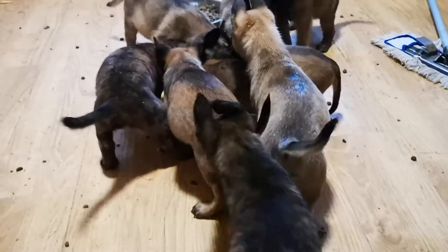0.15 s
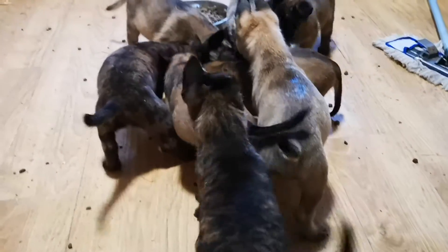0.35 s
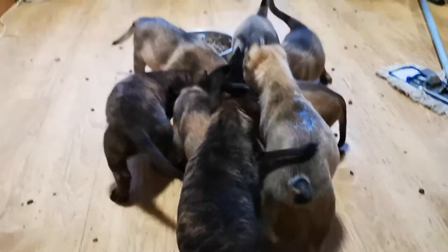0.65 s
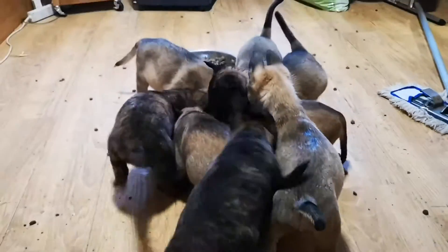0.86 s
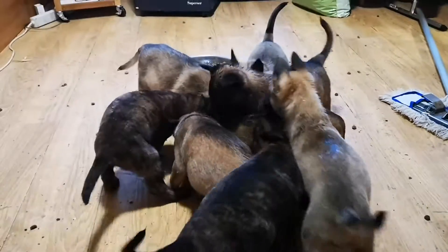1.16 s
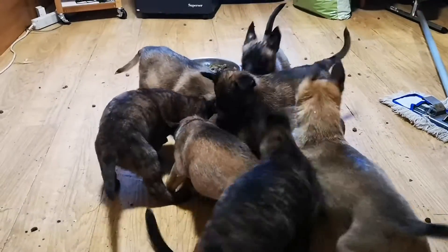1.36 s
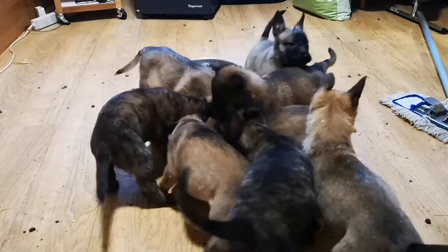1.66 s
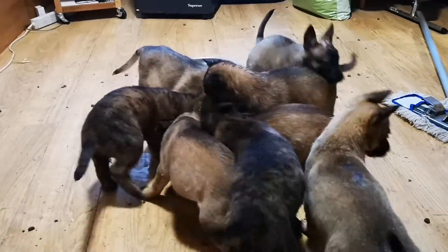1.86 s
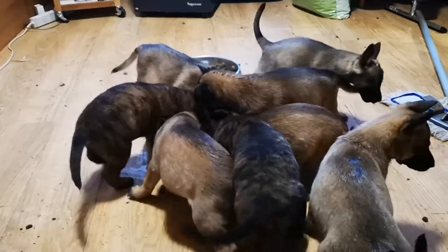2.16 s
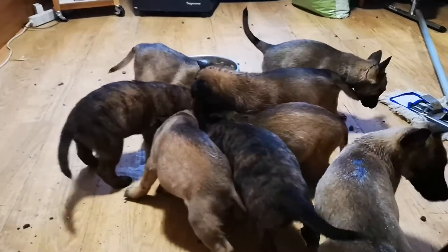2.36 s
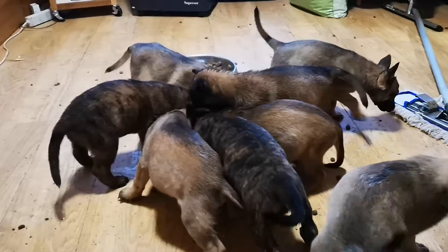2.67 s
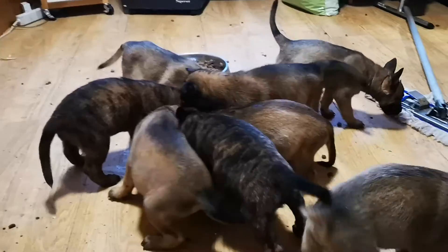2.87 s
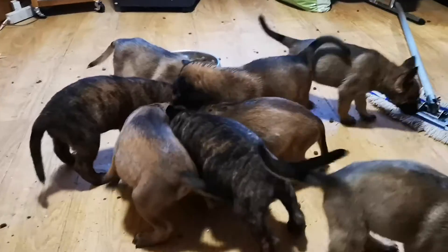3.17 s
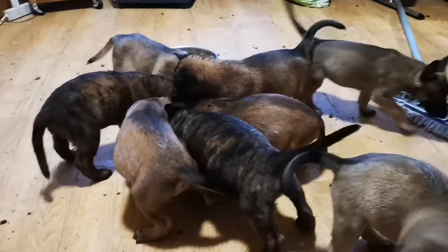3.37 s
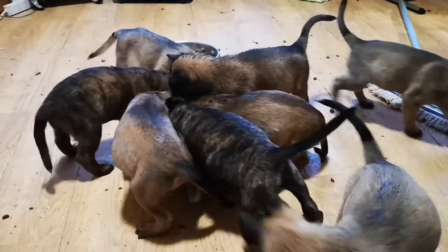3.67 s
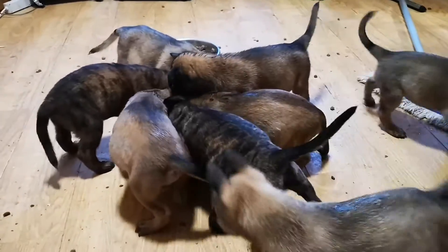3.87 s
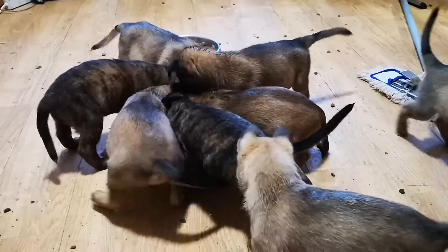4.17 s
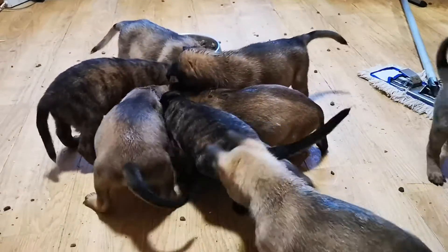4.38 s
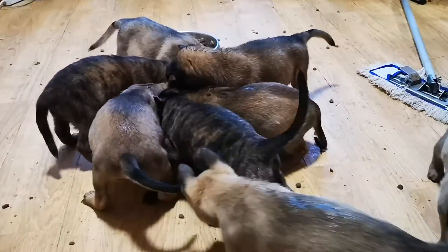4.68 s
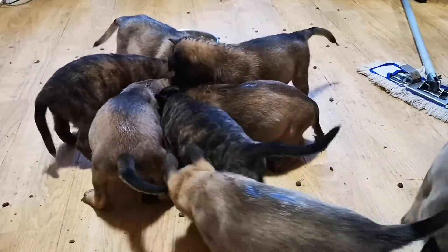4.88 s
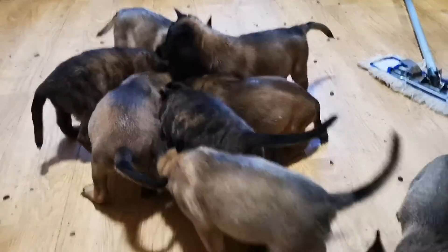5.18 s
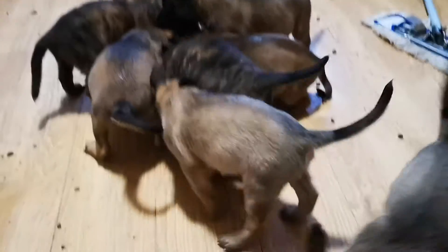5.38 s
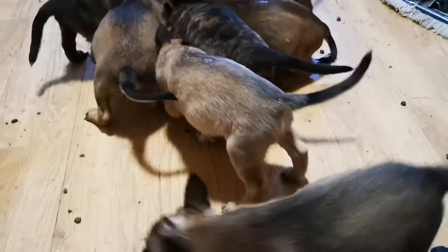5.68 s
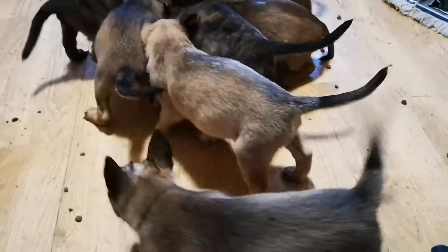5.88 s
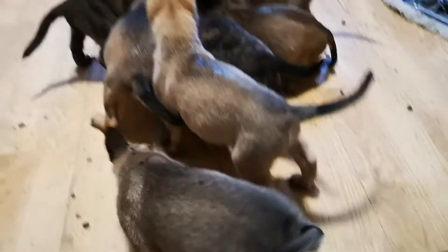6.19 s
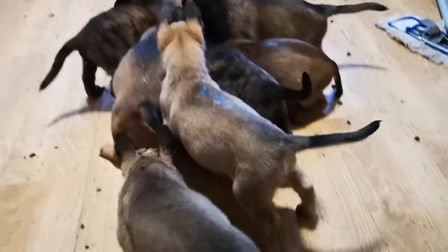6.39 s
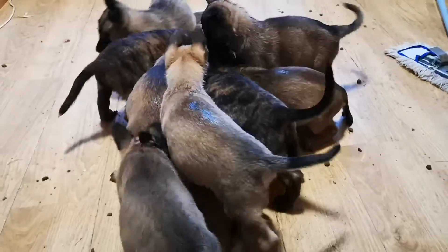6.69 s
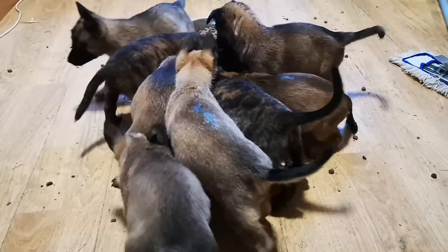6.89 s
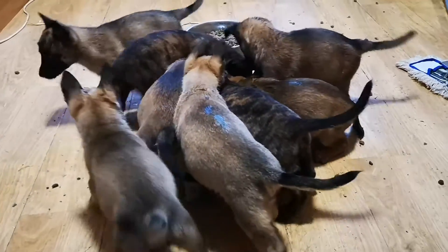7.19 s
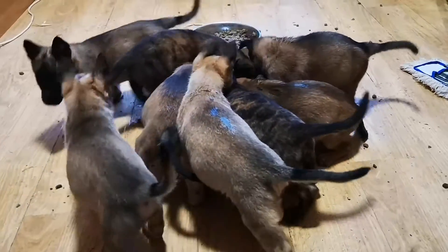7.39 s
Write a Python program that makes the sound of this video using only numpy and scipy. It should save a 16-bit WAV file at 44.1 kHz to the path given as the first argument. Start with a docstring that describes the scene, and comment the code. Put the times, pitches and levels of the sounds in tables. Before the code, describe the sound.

A litter of puppies eats dry kibble indoors, with crunching, wet lip smacks, clicking claws and soft paw thuds on a wooden floor.

```python
"""Small room, wooden floor, close to a phone: a litter of puppies crowds round a bowl of dry kibble.
Paws thud (board flex driving damped modes); claws and kibble click (noise snaps, pitched crunches).
Wet mouths smack (gliding pop, resonant squelch, crackle); scuffling is dense grains, skids are dull scuffs.
Faint house rumble and hiss lie beneath. Diffuse reflections follow all but the low thuds and the ambience."""
import sys
import numpy as np
from scipy import signal
from scipy.fft import rfft, irfft, next_fast_len
from scipy.io import wavfile
from scipy.ndimage import uniform_filter1d

SR = 44100
rng = np.random.default_rng(int(sys.argv[2]) if len(sys.argv) > 2 else 0)


def unload_wav(signal):
    """Save mono or channel-first audio to the path in sys.argv[1] as 16-bit WAV at rate SR, clipped to [-1, 1]."""
    wavfile.write(
        sys.argv[1],
        SR,
        np.round(np.clip(np.atleast_2d(signal).T, -1, 1) * 32767).astype(np.int16),
    )


N = 332055

# paws landing: t/s, relative thud level/dB, flex f/Hz, relative knock level/dB
PAW_LANDINGS = [(0.009, -51, 57.3, -61), (0.182, -33, 76, -41.5), (0.213, -39, 157, -50),
                (0.26, -40.5, 68, -73), (0.526, -48.5, 74, -67.5), (0.711, -37, 86, -53.5),
                (0.798, -43, 86, -53), (0.855, -32, 97.5, -44.5), (0.927, -67, 118, -42),
                (1.018, -44.5, 64, -50), (1.267, -54, 252, -49.5), (1.397, -39.5, 82, -61),
                (1.734, -39.5, 56, -54.5), (1.937, -50, 78.1, -57.5), (2.055, -27.5, 88.7, -46.5),
                (2.121, -33, 89, -54), (2.371, -41.5, 260, -55), (2.468, -46, 270, -56),
                (2.625, -46.5, 60, -52.5), (2.859, -35.5, 93, -46.5), (2.913, -41.5, 111, -63),
                (3.283, -40, 94, -44.5), (3.326, -39, 153, -48), (3.504, -38.5, 81.7, -53),
                (3.781, -43, 117, -50), (3.879, -51.5, 125, -59.5), (4.05, -40.5, 69, -52.5),
                (4.268, -46, 70.0, -75), (4.337, -41, 93.7, -58), (4.523, -42.5, 98, -57),
                (4.694, -40.5, 63, -54.5), (4.949, -31, 81.7, -50.5), (5.041, -38, 74.6, -62),
                (5.099, -39, 86.5, -71), (5.22, -49, 66.5, -54.5), (5.432, -49, 74.5, -53.5),
                (5.647, -34, 102, -45.5), (5.73, -44.5, 60.7, -54), (6.153, -49, 56.3, -70),
                (6.208, -49, 112, -69), (6.402, -53, 207, -53), (6.537, -47, 102, -58),
                (6.598, -47.5, 112, -57.5), (7.267, -41.5, 62.4, -52), (7.309, -42, 65.6, -56),
                (7.428, -43, 89.5, -59)]
# claw and kibble contacts: t/s, relative snap level/dB, relative crunch level/dB, piece f/Hz, left-right/dB
CLICK_EVENTS = [(0.419, -37, -47, 2100, -2), (0.584, -47.5, -54, 3170, -11), (0.8479, -23.5, -40, 3400, 3),
                (1.16, -34.5, -60, 2300, -5.5), (1.332, -24.5, -49.5, 6000, 4),
                (1.3997, -36.5, -51, 2200, -2.5), (1.584, -46, -59, 5660, -6),
                (1.683, -59, -44, 2940, -3.5), (1.725, -34, -47.5, 2630, -3), (1.79, -32, -53, 2420, -4),
                (1.9854, -33, -67, 5750, -7), (1.997, -16.5, -37.5, 5400, -1.5),
                (2.0129, -27, -41, 3460, 1), (2.0624, -23.5, -40.5, 3380, -2), (2.1253, -35, -55, 3550, -7),
                (2.2702, -34.5, -63, 2220, -5), (2.3723, -25, -44, 2480, 5), (2.4146, -28, -50, 2280, -1),
                (2.4647, -33.5, -46, 2180, -9), (2.7871, -34.5, -48, 2200, -8),
                (2.8446, -36, -51, 3820, -1), (2.8726, -16, -35.5, 2100, -1.5),
                (3.252, -25.5, -49, 2200, 3), (3.2936, -29, -48, 2290, -4), (3.3764, -36, -45, 3740, 3),
                (3.465, -34, -41.5, 2400, -2), (3.5098, -29.5, -52, 2280, 2), (3.8422, -47, -35, 2170, -7),
                (3.8565, -58, -37, 3100, 5), (4.006, -57, -53, 2280, 3), (4.0453, -25, -50, 2100, -3),
                (4.0837, -18, -47, 5530, -11), (4.2704, -37.5, -53, 2270, 1), (4.5224, -46, -42, 2400, -7),
                (4.6556, -31, -41, 2080, 0), (4.6708, -21.5, -39, 3300, -2),
                (4.699, -16.5, -25.5, 3600, -6), (4.9513, -26, -33, 3200, -5), (4.995, -29, -44, 3280, 1),
                (5.0358, -24.5, -58, 3170, -2), (5.0861, -27.5, -41, 2590, -3),
                (5.1875, -20.5, -50, 2170, 8), (5.2942, -26, -59, 5350, 2), (5.4931, -34.5, -62, 2260, 3),
                (5.635, -33, -45, 4640, 2), (5.6415, -37, -37.5, 3850, -6), (5.925, -36, -45.5, 4840, -2.0),
                (6.2038, -41, -60, 2200, -3), (6.5415, -33, -58, 2210, -2), (6.9019, -42, -61, 5160, -10),
                (7.0292, -67, -50, 2180, 6), (7.0921, -33, -52, 2210, -5), (7.1383, -35, -49.5, 2520, -8),
                (7.2931, -30.5, -58, 5030, 3), (7.3819, -59, -47, 4000, -2.0)]
# lips and tongues: t/s, relative level/dB, mouth f/Hz, left-right/dB, clear share/1
SMACK_EVENTS = [(0.052, -31, 1843, 3, 0.72), (0.186, -38, 1340, -8, 0.45), (0.348, -42, 1340, -7, 0.41),
                (0.5, -43, 2215, 0, 0.63), (0.573, -41.5, 1780, -5.5, 0.66), (0.67, -40, 970, -8, 0.29),
                (0.689, -38, 2170, 0.5, 0.33), (0.765, -37.5, 972, -3, 0.54),
                (0.957, -34.5, 1060, -11, 0.53), (1.273, -47.5, 1185, 7, 0.48),
                (1.634, -41.5, 2120, 0.0, 0.3), (1.659, -40, 1280, 0.5, 0.64), (1.811, -35, 1810, -2, 0.38),
                (1.953, -33, 1420, 2, 0.19), (2.471, -34, 1800, 0, 0.17), (2.638, -36.5, 1790, -7, 0.31),
                (2.753, -43.5, 940, -5, 0.41), (3.166, -40, 1490, -7, 0.19), (3.228, -43.5, 2340, -9, 0.37),
                (3.262, -41, 2030, -2, 1), (3.294, -35.5, 2280, 2, 0.29), (3.466, -32.5, 2280, 12.5, 0.34),
                (3.766, -31, 1770, 1, 0.65), (3.797, -39, 1970, 16.5, 0.5), (3.821, -37.5, 1810, 18, 0.7),
                (4.061, -33.5, 2000, -3, 0.4), (4.126, -39, 1490, -19, 0.29),
                (4.278, -41.5, 1965, -9.5, 0.31), (4.327, -40.5, 2180, 4, 0.26),
                (4.417, -42.5, 1110, 11, 0.17), (4.522, -37, 910, 0.5, 0.23),
                (4.623, -40.5, 1780, -6, 0.56), (4.656, -38, 1780, -1, 0.6), (4.754, -36, 1470, -9, 0.68),
                (4.871, -47, 886, -3, 0.57), (5.161, -42.5, 1460, 8, 0.33), (5.184, -37, 1430, -15, 0.29),
                (5.257, -43, 990, -2, 0.34), (5.435, -47, 857, 4, 0.52), (5.54, -31.5, 1246, 1, 0.29),
                (5.728, -41, 1295, 8, 0.38), (5.856, -38, 1580, 0, 0.2), (5.956, -41, 2066, -15, 0.39),
                (6.267, -43.5, 1500, -1, 0.54), (6.38, -44, 1380, -4, 0.21),
                (6.408, -44.5, 2330, 0.5, 0.53), (6.5, -48, 2010, 0, 0.17), (6.636, -46, 2310, -2.0, 0.23),
                (6.65, -49.5, 1770, -12, 0.39), (7.035, -45, 1710, 2, 0.52), (7.405, -37, 1025, 0.0, 0.28),
                (7.459, -32.5, 2220, 1, 0.74)]
# shoves at the bowl: t/s, length/s, relative levels of claws/dB, kibble/dB, pads and coats/dB
SHOVE_EVENTS = [(0.0, 0.039, -50.5, -47.5, -48.5), (0.037, 0.096, -57, -57, -57),
                (0.175, 0.066, -45.5, -53, -47.5), (0.693, 0.26, -57.5, -52.5, -52.5),
                (0.842, 0.042, -44, -62, -44.5), (0.935, 0.099, -46, -47.5, -46.5),
                (1.078, 0.37, -55, -58, -53), (1.337, 0.068, -48.5, -47.5, -52.5),
                (1.632, .1, -59, -47, -47), (1.973, 0.068, -45, -50, -46), (2.049, 0.03, -63, -47.5, -39.5),
                (2.275, .09, -48.5, -49.5, -52.5), (2.37, 0.18, -47.5, -47, -49.5),
                (2.607, 0.27, -66, -58, -51.5), (2.865, 0.065, -53, -48, -53.5),
                (3.26, 0.21, -50.5, -49, -50.5), (3.46, 0.079, -49, -64, -51.5),
                (3.694, 0.12, -52.5, -52.5, -57.5), (3.803, 0.07, -38.5, -43, -51),
                (4.077, 0.085, -42.5, -46, -52.5), (4.52, 0.088, -45.5, -45, -51.5),
                (4.671, 0.038, -37, -45.5, -55), (4.75, 0.016, -57, -57, -46.5),
                (4.965, .1, -49.5, -51, -55.5), (5.061, 0.02, -44, -50, -46.5),
                (5.175, 0.046, -42, -52, -44), (5.255, 0.086, -50, -53.5, -54),
                (5.428, 0.11, -57.5, -51, -52.5), (5.619, 0.092, -48.5, -62, -51.5),
                (5.786, 0.15, -65, -56, -55), (5.915, 0.097, -47, -56, -51.5),
                (6.385, 0.063, -82, -50.5, -69), (6.527, 0.017, -77, -55, -74), (6.726, .12, -67, -79, -59),
                (7.064, 0.037, -57, -53.5, -50.5), (7.288, 0.12, -49, -58, -53),
                (7.376, 0.18, -57.5, -50, -54)]
# time constants after a shove: claws/s, kibble/s, pads/s
SHOVE_RELEASE_S = (0.041, 0.051, 0.046)
# fidgeting and chewing between shoves: relative levels of claws/dB, kibble/dB, pads/dB
IDLE_LEVELS_DB = (-63, -59, -64.5)
# pads skidding on the boards: t/s, length/s, relative level/dB, centre f/Hz
SKID_EVENTS = [(1.097, 0.018, -58, 447), (1.224, 0.063, -60, 470), (2.062, 0.039, -52, 850),
               (2.749, 0.013, -58, 446), (4.517, 0.021, -56.5, 620), (6.71, 0.015, -57.5, 760),
               (6.787, 0.027, -66, 610), (7.06, 0.037, -54.5, 616), (7.119, 0.018, -56.5, 870),
               (7.453, 0.018, -48.5, 850)]
# low floorboard modes: f/Hz, relative level/dB, t60/s
BOARD_MODES = [(61.6, 4.5, 0.39), (69.5, -13, 0.62), (79.6, 8, 0.41), (98, 3, 0.62), (111.4, 17.5, 0.32)]
# upper floorboard modes: f/Hz, relative level/dB, t60/s
KNOCK_MODES = [(162.2, 0.5, 0.17), (191.3, 1, 0.22), (224, -9.5, 0.11), (266.4, -6, 0.27),
               (313.5, -14, 0.084), (370, -9.5, 0.14)]
# spectrum of a hard tip snapping: f/Hz, gain/dB
SNAP_COLOUR = [(1000, -31), (3000, -17.5), (5500, -3.5), (8000, 1.5), (10000, -0.5), (15000, -5)]
# spectrum of scratching claws: f/Hz, gain/dB
SCRATCH_COLOUR = [(300, -38), (1000, -26), (2200, -1.5), (3200, 0.5), (5500, -3), (9000, -6.5), (15000, 0)]
# spectrum of chewing and of wet crackle: f/Hz, gain/dB
CHEW_COLOUR = [(400, -8.5), (700, -8), (1000, 0.5), (1400, -0.5), (2000, 2.5), (2500, -1.5), (3200, -7.5),
               (7000, -18)]
# spectrum of rubbing pads and coats: f/Hz, gain/dB
RUB_COLOUR = [(25, 2), (45, 5.5), (70, 7.5), (110, 8.5), (170, 0), (270, 3), (400, -2.5), (650, -12),
              (1200, -13.5), (4000, -23)]
# spectrum of the quiet house: f/Hz, gain/dB
AMBIENT_COLOUR = [(20, 5.5), (70, 15), (150, 5), (500, -26.5), (2000, -36.5), (5000, -47), (15000, -34.5)]
# reverberation of the room: f/Hz, t60/s
ROOM_T60_S = [(100, 0.04), (400, 0.39), (1200, 0.27), (3000, 0.37), (8000, 0.33), (15000, 0.091)]
# balance of the two ports: f/Hz, left-right/dB
PORT_BALANCE = [(400, 0), (1000, -0.5), (2200, 0), (4000, 4), (8000, -3.5), (15000, -5.5)]
# microphone response: f/Hz, gain/dB
MICROPHONE_RESPONSE = [(20, 7), (4500, 0), (5700, 4), (6500, -1.5), (7800, 1.5), (8500, -2.5), (9400, 1.5),
                       (10400, -11), (12500, -14.5), (15000, -18)]

SHOVE_ATTACK_S = 0.0092
IDLE_SWING_DB, IDLE_CHANGES_PER_S = 2.5, 12
PORT_LAG_SAMPLES, PORT_LAG_SPREAD_SAMPLES = 3, 4.9  # mean left lead, scatter over the litter
TOP_HZ = 15600


def paws(cycles=0.77, settle=0.18, settle_s=0.023, flex_db=-3, boards_db=-5, knock_db=6,
         knock_room_db=-12, heel_s=0.0018, low_cut_hz=42):
    """A soft pad flexes its board for a few swings; the whole floor rings on as the weight settles."""
    thuds, knocks = np.zeros((2, N)), np.zeros((2, N))
    t = np.arange(SR // 2) / SR
    for s, db, hz, upper_db in PAW_LANDINGS:
        swings = t * hz / cycles
        flex = peak(swings ** 2 * np.exp(-1.5 * swings) * np.sin(2 * np.pi * hz * t))
        shuffle = rng.standard_normal(len(t)) * np.exp(-t / settle_s)
        boards = ring(BOARD_MODES, flex + 12 * settle * shuffle, t, np.ones(len(BOARD_MODES)))
        add(thuds, s, undb(db) * (undb(flex_db) * flex + undb(boards_db) * boards))

        heel = t / heel_s * np.exp(-t / heel_s)
        spot = undb(5.1 * rng.standard_normal(len(KNOCK_MODES)))  # each spot favours other modes
        knock = ring(KNOCK_MODES, heel + 6 * settle * shuffle, t, spot)
        add(knocks, s, undb(upper_db + knock_db) * knock)
    high_pass = signal.butter(2, low_cut_hz, "high", fs=SR, output="sos")
    floor = signal.sosfilt(high_pass, thuds)
    return floor + knocks + undb(knock_room_db) * room(knocks)


def ring(modes, push, t, gains):
    """Modes driven by a force; neighbours swing in opposite senses and radiate by their speed."""
    response = np.zeros(len(t))
    for k, (gain, (hz, db, t60_s)) in enumerate(zip(gains, modes)):
        decay = np.exp(-np.log(1000) * t / t60_s)
        response += (-1) ** k * gain * undb(db) * np.cos(2 * np.pi * hz * t) * decay
    return peak(signal.fftconvolve(push, response)[:len(t)])


def clicks(snap_rise_s=0.00049, crush_rise_s=0.0013, bounce_s=0.00211, bounce=1.0, skitter=0.16,
           skitter_s=0.012, crunch_hz=3000, crunch_q=5.4, shell=0.36, snap_db=-1, crunch_db=11,
           snap_room_db=-4, crunch_room_db=-1, crunch_pan=0.081):
    """A hard tip snaps, touches again and skitters to rest; the struck piece rings at its own pitch."""
    snaps, crunches = np.zeros((2, N)), np.zeros((2, N))
    t = np.arange(SR // 10) / SR
    for s, db, body_db, hz, pan_db in CLICK_EVENTS:
        crack, crumbs = rng.standard_normal((2, len(t)))
        again = int(SR * bounce_s * rng.uniform(0.6, 1.23))
        lag = port_lag()
        rest = skitter * unit(crumbs ** 3) * np.exp(-t / skitter_s)

        def strike(rise_s):
            """Noise under a contact pulse and its rebound, then the skitter."""
            touch = t / rise_s * np.exp(1 - t / rise_s)
            return crack * (touch + bounce * np.roll(touch, again)) + rest

        tip = strike(snap_rise_s)
        crush = strike(crush_rise_s)  # duller, outlasts the snap
        body = resonate(resonate(crush, crunch_hz, 0.82), crunch_hz, 0.82)
        crunch = peak(body) + shell * peak(resonate(body, hz, crunch_q))
        add(snaps, s, undb(db + snap_db) * peak(colour(tip, SNAP_COLOUR)), pan_db, lag)
        add(crunches, s, undb(body_db + crunch_db) * peak(crunch), crunch_pan * pan_db, lag)
    return snaps + crunches + room(undb(snap_room_db) * snaps + undb(crunch_room_db) * crunches)


def smacks(open_s=0.0028, q=4, glide=0.034, wet=0.37, spit=1.1, spit_s=0.0085, seal=2.83,
           direct_db=-1, room_db=1.0):
    """A tongue pulls free with a wet crackle; the mouth cavity rings, sliding as the jaw moves."""
    out = np.zeros((2, N))
    t = np.arange(SR // 20) / SR
    for s, db, hz, pan_db, clear in SMACK_EVENTS:
        release = np.sqrt(t / open_s) * np.exp(-t / open_s)
        film, bubbles = rng.standard_normal((2, len(t)))
        bubbles[0] = seal  # the seal breaks first, then smaller films burst
        pitch_hz = hz * (1 + glide * rng.choice([-1, 1]) * np.tanh(t / open_s - 1))
        pop = peak(release * np.sin(2 * np.pi * np.cumsum(pitch_hz) / SR))
        squelch = peak(resonate(film * release, hz, q))
        crackle = peak(colour(bubbles ** 3 * np.exp(-t / spit_s), CHEW_COLOUR))
        smack = clear * pop + wet * squelch + spit * (1 - clear) * crackle
        add(out, s, undb(db) * peak(smack), pan_db, port_lag())
    return undb(direct_db) * out + undb(room_db) * room(out)


def jostle(scratch_db=-6, chew_db=-5.0, rub_db=-4, scratch_room_db=1, chew_room_db=2, rub_room_db=-11):
    """Claws scratch, teeth grind kibble, pads rub: dense grains whose strength follows the scramble."""
    claws, jaws, pads = scramble()
    scratch = tuned_grains(np.geomspace(1500, 11000, 6), rate_per_s=170, spread_db=4, grain_s=0.00053, q=2.6)
    chew = tuned_grains(np.geomspace(620, 2400, 8), rate_per_s=50, spread_db=3.0, grain_s=0.0024, q=3.1)
    rub = roughen(grains(rate_per_s=450, spread_db=4), grain_s=0.0074).mean(0)
    layers = ((colour(scratch, SCRATCH_COLOUR), claws, scratch_db, scratch_room_db),
              (colour(chew, CHEW_COLOUR), jaws, chew_db, chew_room_db),
              (colour(rub, RUB_COLOUR) * np.ones((2, 1)), pads, rub_db, rub_room_db))
    return sum(undb(db) * effort * unit(x + undb(wet_db) * room(x)) for x, effort, db, wet_db in layers)


def scramble():
    """Strength of claws, kibble, pads: each shove sets in fast, holds, dies away over a restless idle."""
    t = np.arange(N) / SR
    power = np.array([undb(db + IDLE_SWING_DB * wander(IDLE_CHANGES_PER_S)) ** 2 for db in IDLE_LEVELS_DB])
    for s, length_s, *levels_db in SHOVE_EVENTS:
        attack = np.clip((t - s) / SHOVE_ATTACK_S, 0, 1)
        after_s = np.clip(t - s - length_s, 0, 1)
        for part, (db, release_s) in enumerate(zip(levels_db, SHOVE_RELEASE_S)):
            power[part] += (undb(db) * attack * np.exp(-after_s / release_s)) ** 2
    return np.sqrt(power)


def wander(rate_per_s):
    """Random levels, one per period, joined by steady ramps."""
    period = int(SR / rate_per_s)
    steps = np.repeat(rng.standard_normal(N // period + 1), period)
    return uniform_filter1d(steps, period)[:N]


def grains(rate_per_s, spread_db):
    """Random tiny contacts of very unequal size, each somewhere between left and right."""
    count = int(rate_per_s * N / SR)
    when, size, place = rng.random((count, 3)).T
    size = undb(-spread_db * np.log(np.maximum(size, .01)))
    angle = place * np.pi / 2
    out = np.zeros((2, N))
    out[:, (when * N).astype(int)] = size * np.array([np.cos(angle), np.sin(angle)])
    return out


def roughen(contacts, grain_s):
    """Each contact drags on as a tiny burst of friction noise."""
    envelope = signal.lfilter([1], [1, -np.exp(-1 / (grain_s * SR))], contacts)
    return envelope * rng.standard_normal(N)


def tuned_grains(pitches_hz, rate_per_s, spread_db, grain_s, q):
    """Separate streams of grains, each ringing at its own pitch."""
    return sum(resonate(roughen(grains(rate_per_s, spread_db), grain_s), hz, q) for hz in pitches_hz)


def skids(q=1.36, fade_s=0.0062, room_db=-4):
    """A pad catches and slips in quick uneven steps, giving a short dull scuff."""
    out = np.zeros((2, N))
    t = np.arange(SR // 6) / SR
    slips = roughen(grains(rate_per_s=710, spread_db=5.5).mean(0), grain_s=0.0012)
    for s, length_s, db, hz in SKID_EVENTS:
        scuff = unit(resonate(resonate(slips, hz, q), hz, q))[:len(t)]
        slips = np.roll(slips, len(t))  # other slips for the next skid
        fade = np.exp(-np.maximum(t - length_s, 0) / fade_s)
        add(out, s, undb(db) * scuff * fade, 0, port_lag())
    return out + undb(room_db) * room(out)


def room(x, build_s=0.0017):
    """Diffuse reflections build up quickly and die band by band, unrelated at the two ports."""
    t = np.arange(SR // 2) / SR
    spectrum = rfft(rng.standard_normal((2, len(t))))
    octave = np.log2(np.clip(np.fft.rfftfreq(len(t), 1 / SR), 125, 16000) / 125)
    tail = 0
    for k in range(8):
        band = irfft(spectrum * np.maximum(1 - np.abs(octave - k), 0), len(t))
        t60_s = lookup(ROOM_T60_S, 125 * 2 ** k)
        tail = tail + band * np.exp(-np.log(1000) * t / t60_s)
    tail = unit(tail * (1 - np.exp(-t / build_s))) / np.sqrt(len(t))
    return signal.fftconvolve(x.mean(0)[None], tail, axes=1)[:, :N]


def ambience(level_db=-62):
    """Faint house rumble, alike at both ports, under a thin hiss that differs between them."""
    mid, side = rng.standard_normal((2, N))
    side = colour(side, [(100, -85), (600, 25.5)])
    return undb(level_db) * unit(colour(np.array([mid + side, mid - side]), AMBIENT_COLOUR))


def port_lag():
    """Path difference in samples for one random spot near the bowl."""
    return PORT_LAG_SAMPLES + PORT_LAG_SPREAD_SAMPLES * rng.standard_normal()


def add(track, s, sound, pan_db=0, lag=0):
    """Put a sound on both channels; lag (samples) is its extra path to the right port."""
    for channel, side in enumerate((1, -1)):
        start = max(int(s * SR) + channel * int(lag), 0)
        part = sound[:max(N - start, 0)]
        track[channel, start:start + len(part)] += part * undb(side * pan_db / 2)


def undb(db):
    """dB to amplitude ratio."""
    return 10 ** (np.asarray(db) / 20)


def unit(x):
    """Scale to rms 1."""
    return x / np.sqrt(np.mean(x ** 2))


def peak(x):
    """Scale to peak 1."""
    return x / np.max(np.abs(x))


def lookup(points, hz):
    """Read (f/Hz, value) points on a log-frequency axis."""
    f, value = np.transpose(points)
    return np.interp(np.log(hz + 1), np.log(f), value)


def colour(x, points):
    """Filter by (f/Hz, gain/dB) points."""
    size = next_fast_len(x.shape[-1] + SR // 20)
    gain = undb(lookup(points, np.fft.rfftfreq(size, 1 / SR)))
    return irfft(rfft(x, size) * gain, size)[..., :x.shape[-1]]


def resonate(x, hz, q):
    """A two-pole resonance."""
    return signal.lfilter(*signal.iirpeak(hz, q, fs=SR), x)


def scene():
    """The whole litter feeding, over the quiet of the house."""
    return paws() + clicks() + smacks() + jostle() + skids() + ambience()


def record(dry):
    """The phone's two ports differ in balance over frequency; its response ripples the treble, cut at the top."""
    ports = np.array([colour(x, [(hz, side * db / 2) for hz, db in PORT_BALANCE])
                      for x, side in zip(dry, (1, -1))])
    heard = colour(ports, MICROPHONE_RESPONSE)
    low_pass = signal.ellip(8, .2, 70, TOP_HZ, fs=SR, output="sos")
    return signal.sosfilt(low_pass, heard)


dry = scene()
out = record(dry)
unload_wav(out)
```